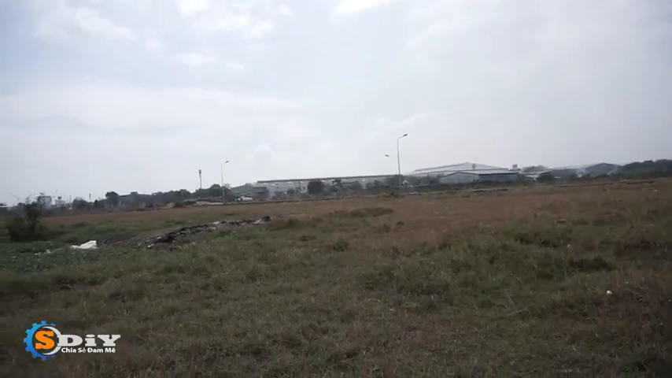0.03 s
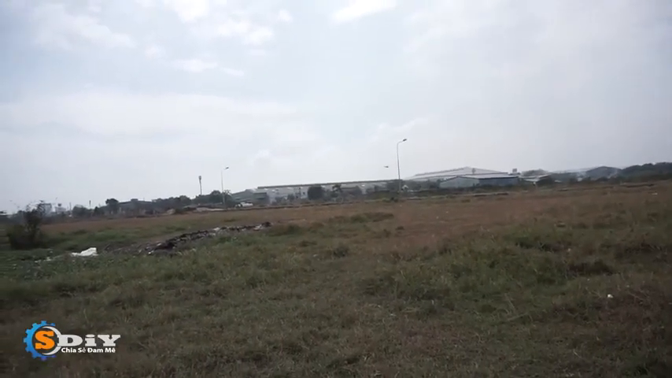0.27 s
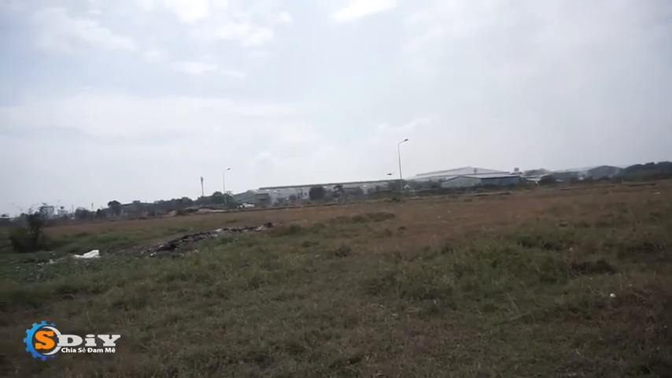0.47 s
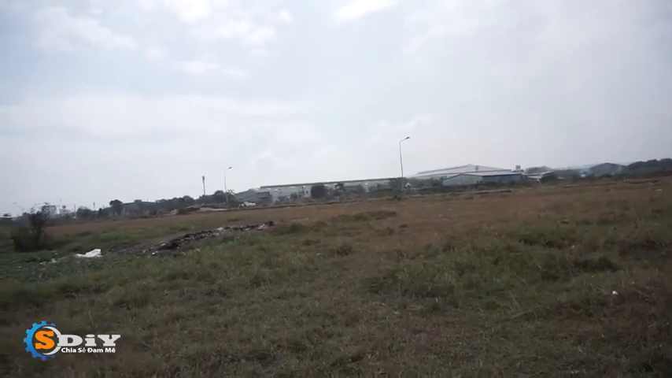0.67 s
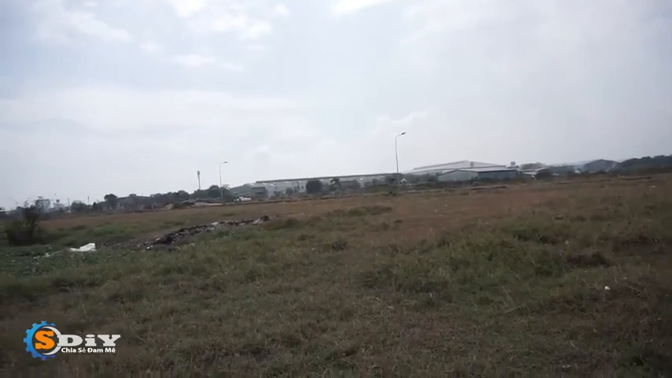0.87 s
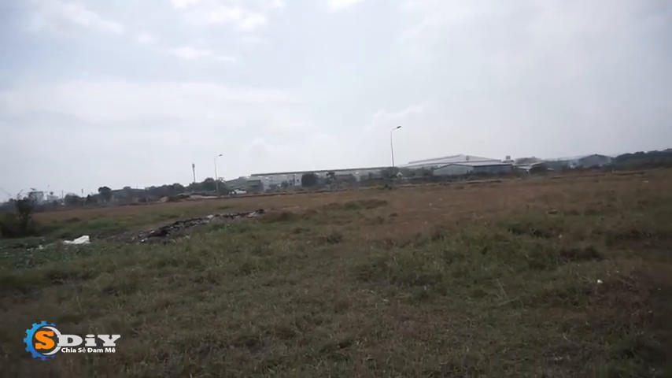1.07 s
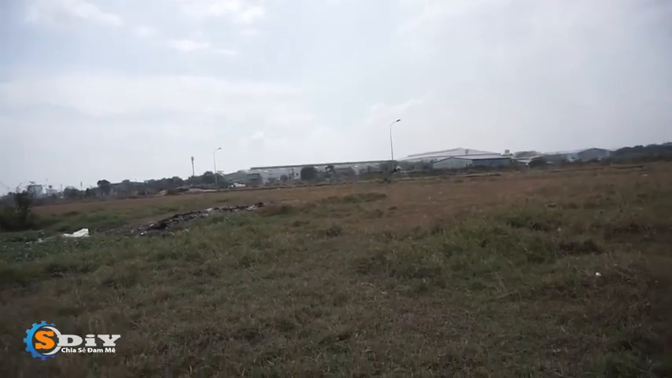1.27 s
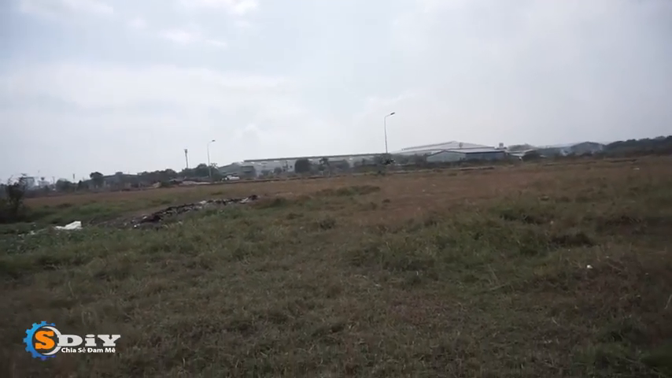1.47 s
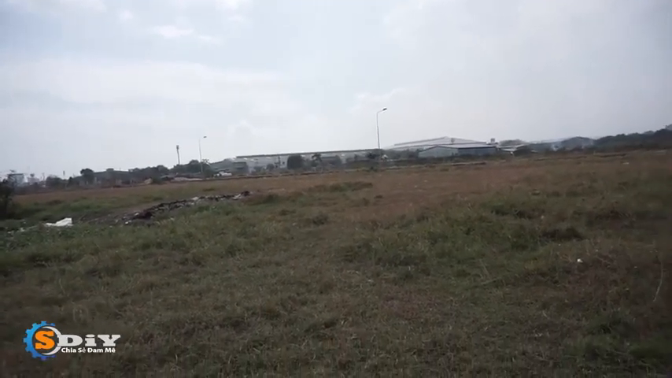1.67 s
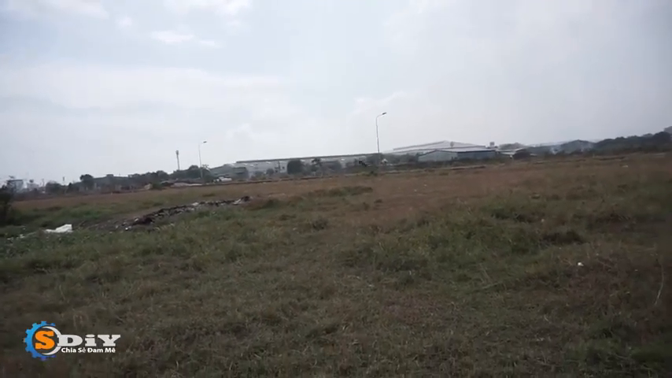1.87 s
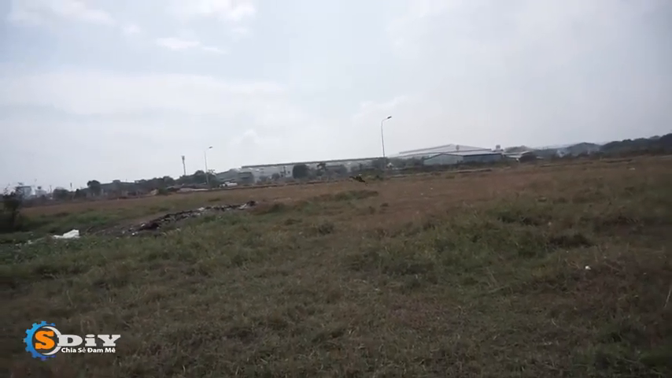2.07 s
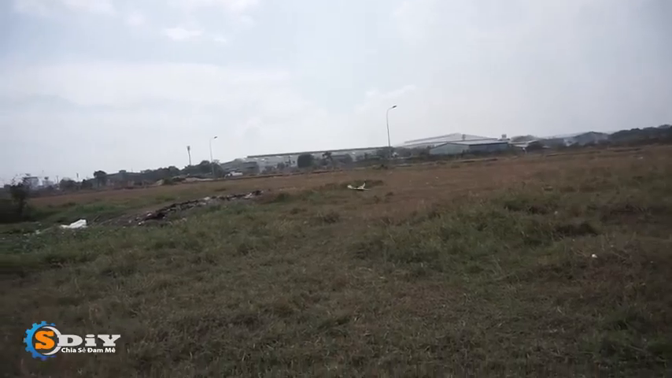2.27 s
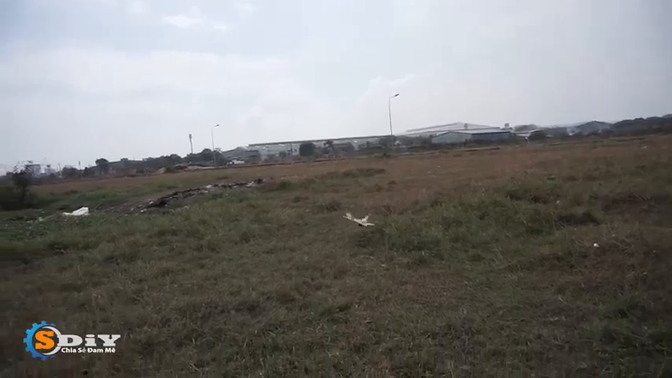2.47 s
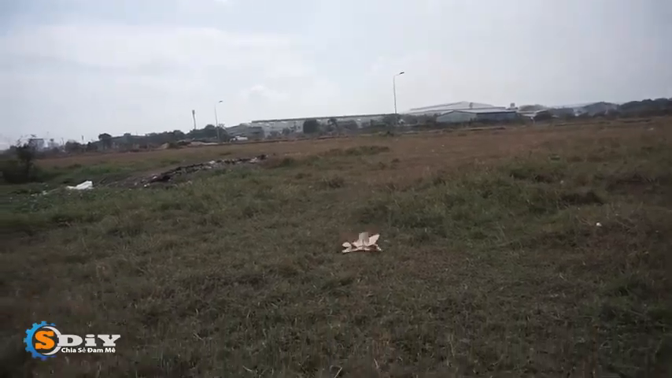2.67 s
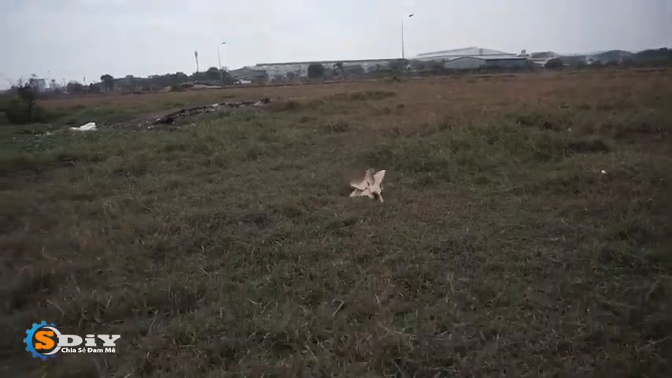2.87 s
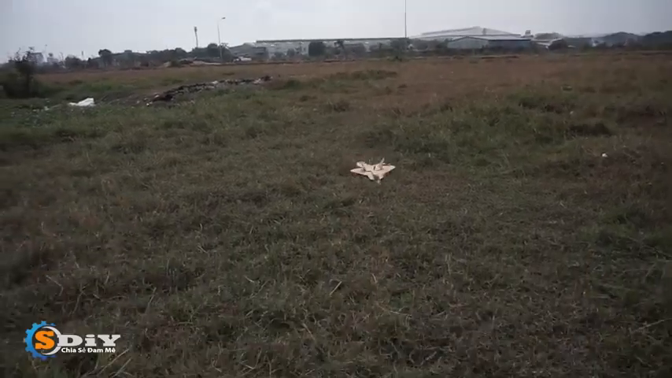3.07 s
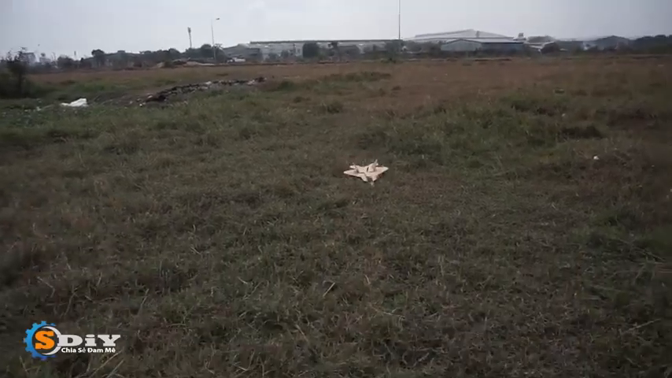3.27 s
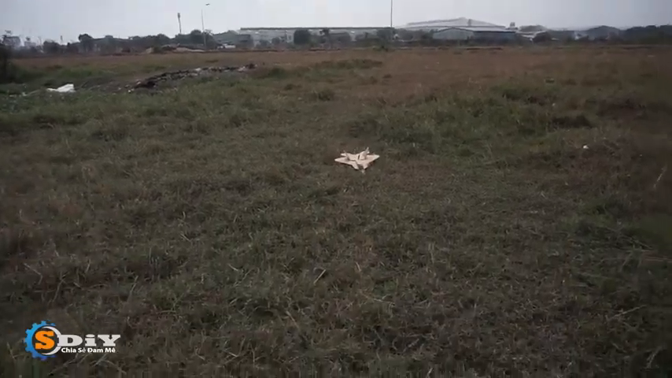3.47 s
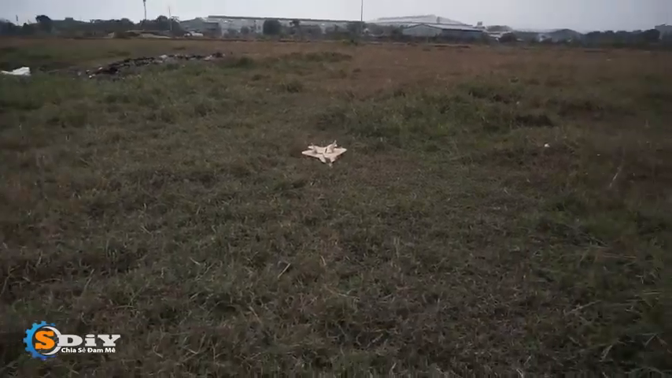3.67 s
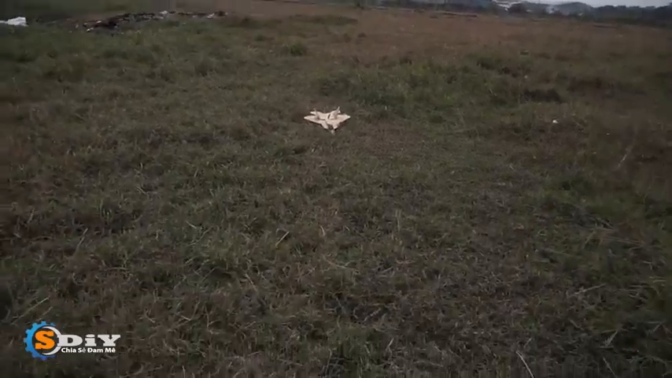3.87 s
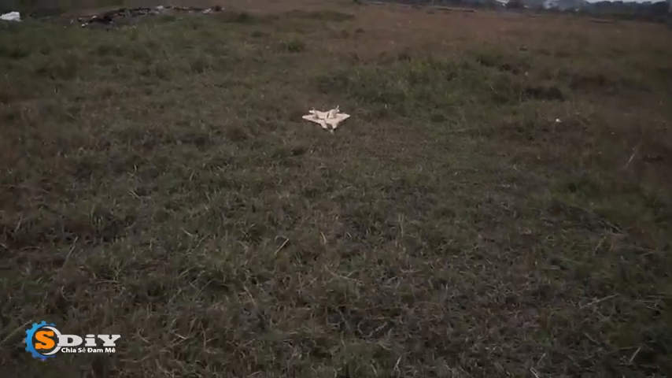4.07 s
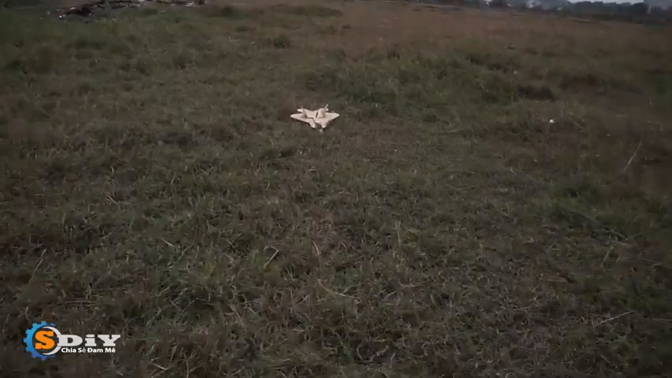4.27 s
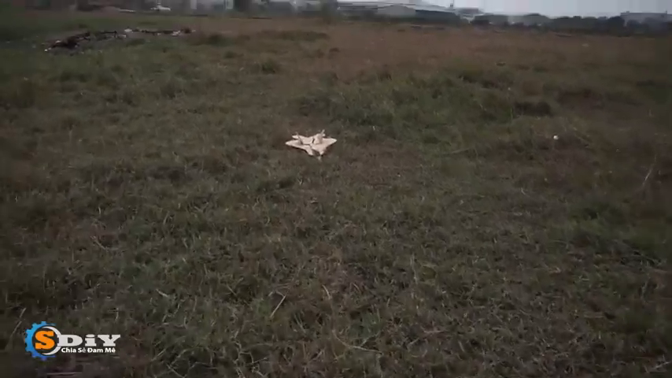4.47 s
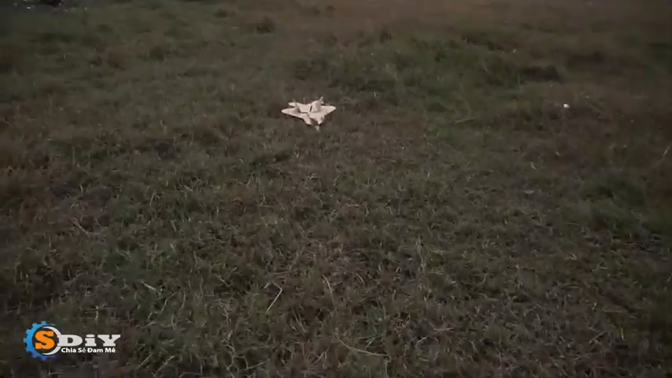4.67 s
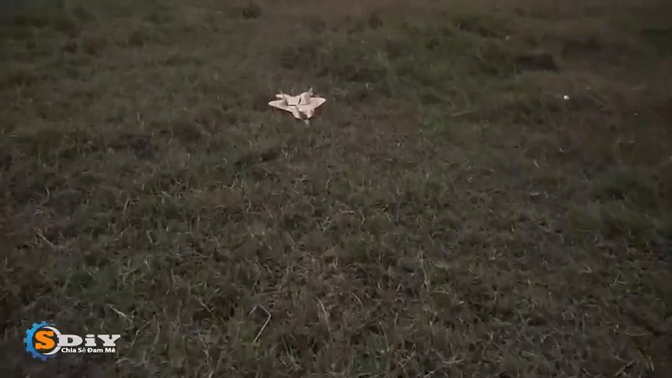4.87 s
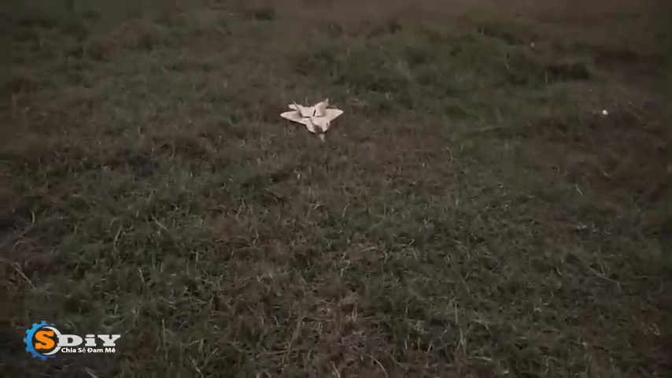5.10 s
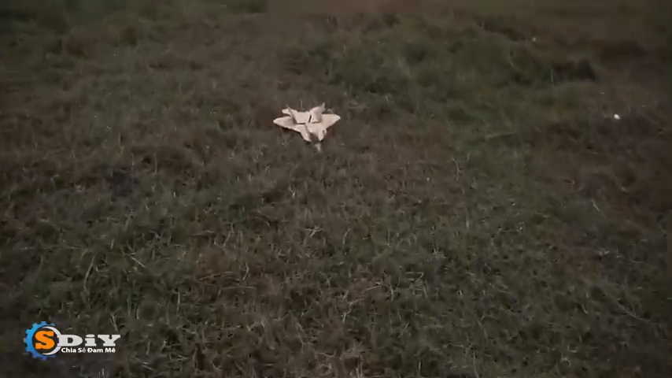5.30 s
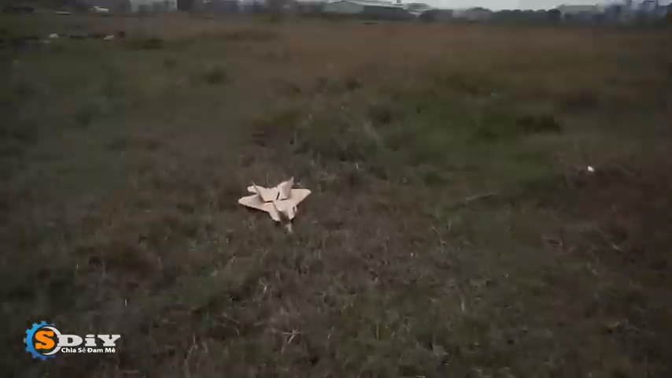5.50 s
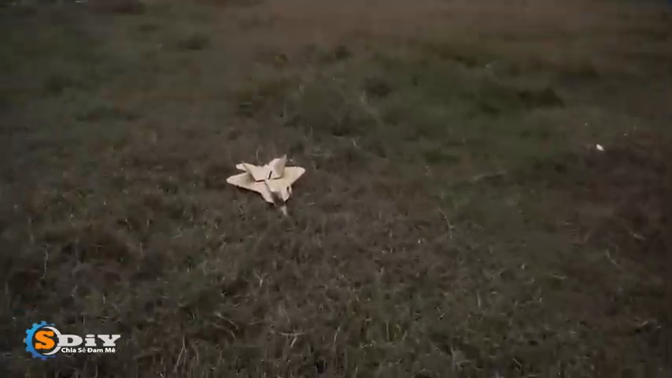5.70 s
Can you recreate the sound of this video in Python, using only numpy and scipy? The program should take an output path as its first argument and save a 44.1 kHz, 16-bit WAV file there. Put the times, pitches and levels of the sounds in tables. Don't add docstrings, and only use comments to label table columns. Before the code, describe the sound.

A small electric model plane buzzes up, winds down and crash-slides into dry grass, while a cricket rasps and footsteps then crackle through stalks.

```python
import sys
import numpy as np
from scipy import signal
from scipy.fft import rfft, irfft, next_fast_len
from scipy.io import wavfile
from scipy.ndimage import uniform_filter1d, map_coordinates

SR = 44100
rng = np.random.default_rng(int(sys.argv[2]) if len(sys.argv) > 2 else 0)


def linear_from_db(decibels):
    return 10 ** (np.asarray(decibels, float) / 20)


def wav_out(sig):
    wavfile.write(sys.argv[1], SR, np.round(np.clip(np.atleast_2d(sig).T, -1, 1) * 32767).astype(np.int16))


N = 253134
T = np.arange(N) / SR

# time in # seconds, level in dB.
BREEZE_LEVEL = [(0, -48.5), (.24, -50), (.28, -53.5), (.5, -51.5), (.8, -49.5), (1.6, -45), (2.2, -48.5),
                (2.6, -48.5), (2.9, -46.5), (3.3, -49.5), (3.65, -49.5), (4.2, -50.5), (4.75, -49),
                (5.0, -50), (5.74, -48.5)]
# frequency in Hz, dB per Hz.
RUMBLE = [(12, -60), (20, -27), (124, -7), (203, -3.5), (231, -4.5), (325, -2.5), (600, -9), (780, -48),
          (1320, -120)]
BREEZE = [(180, -18.5), (300, -12.5), (448, -5), (653, -1.5), (1220, -3), (1420, -5.5), (2230, -5.5),
          (6000, -13.5), (7800, -19), (13200, -120)]
HISS = [(2350, -16), (4000, -3.5), (4310, -6), (4670, -7.5), (9310, -2.5), (10400, -2), (11700, -5),
        (15800, -10.5)]
# frequency in Hz, left-right likeness (-1 to 1).
ALIKE = [(30, 0.5), (70, 0.86), (150, 0.87), (380, 0.018), (950, -0.47), (2380, -0.16), (5980, -0.33),
         (15000, 0.21)]
# frequency in Hz, left-right in dB.
BREEZE_SHADE = [(800, 0), (1600, -3), (3500, -3), (6000, 0)]
RUMBLE_DB, HISS_DB, HISS_GROWS = -62, -54, 1.2
GUST_DB = .8
STIRRED_DB, STIRRED_HISS_DB = -13, -17

# start in seconds, end in seconds, top level in dB, left-right in dB,
# lower wing mode in dB.
CRICKET = [
    (-.2, 0.215, -43.5, 7.5, -9.5),
    (.41, 0.853, -43.5, 7.5, -13),
    (1.1, 1.519, -41.5, 7, -11),
    (1.76, 2.175, -42.5, 8.5, -14),
    (2.41, 2.723, -42.5, 11.5, -15.5),
    (3.07, 3.473, -40, 24, -21),
    (3.71, 4.165, -41.5, 18, -14),
    (4.42, 4.747, -52.5, 10, -4),
]
WARM_UP_DB, WARM_UP_S, STOP_S = 20, 0.076, 0.0096
WING_HZ, WARM_UP_HZ = 11045, 240
FACING, TURNED, TURN_S = 2.8, .9, 2.9

# time in seconds, level in dB, lag of the ground echo in ms.
APPROACH = [(.68, -68, .04), (.74, -60, .02), (.8, -51, 0.027), (.86, -44, 0.055), (.95, -43, 0.034),
            (1.03, -43.5, 0.052), (1.2, -40.5, 0.028), (1.36, -39, 0.047), (1.46, -39, 0.06),
            (1.52, -41.5, 0.052), (1.6, -47, 0.04), (1.69, -47.5, 0.26), (1.83, -49.5, 0.34),
            (1.98, -55.5, 0.35), (2.06, -65, 0.38), (2.4, -69, 0.49), (2.7, -67, 1)]
# time in seconds, rate in Hz.
SPEED = [(0.684, 345), (0.748, 494), (0.786, 543), (0.836, 577), (0.944, 602), (1.002, 570), (1.065, 554),
         (1.2, 560), (1.464, 558.4), (1.516, 519.5), (1.6, 414), (1.684, 343), (1.83, 328), (2.03, 244),
         (2.18, 191), (2.35, 160), (2.55, 135), (2.7, 122.5)]
# order, level in dB.
BLADE = [(1, -11.5), (2, -7), (3, 4), (4, -7), (5, -3), (6, -4.5), (7, -7), (8, -11), (9, -8), (10, -17.5),
         (11, -17), (12, -14.5), (13, -32), (14, -12), (15, -16), (16, -18)]
# order, time in seconds,
# width in seconds, gain in dB.
LOBES = [(4, 0.86, 0.15, 7.5), (4, 1.194, 0.055, -4), (4, 1.414, 0.096, 5.5), (3, 0.87, 0.082, -1),
         (3, 1.546, 0.077, -6), (5, 0.91, 0.052, -2.5), (5, 1.526, 0.039, 3), (6, 0.93, 0.053, 1.5),
         (6, 1.46, 0.09, -10), (7, 1.01, 0.053, -2.5), (7, 1.447, 0.043, 6), (9, 0.89, 0.064, -11),
         (7, 1.4, 0.0355, -0.5), (7, 1.72, 0.05, 5), (10, 1.9, 0.09, -8), (9, 1.72, .06, -1),
         (8, 1.95, .07, 6), (7, 1.95, .06, 4), (10, .97, 0.065, -4), (6, 2.0, .08, 0), (4, 2.25, 0.29, 14),
         (7, 2.07, 0.088, 11), (3, 2.37, 0.13, -20), (5, 0.76, 0.031, 7.5), (11, 1.1, 0.36, -17),
         (9, .78, .04, 7.5), (8, 0.8, 0.044, 3), (7, .72, 0.044, -8), (6, 0.76, 0.034, 0),
         (13, 1.53, .07, 13), (8, 1.76, .05, -12), (6, 1.81, 0.081, -13), (9, 1.84, .04, -18),
         (5, 2.02, 0.11, -11), (11, 2.03, .12, 15), (9, 2.2, 0.05, 13), (10, 2.2, .08, 13),
         (7, 2.35, .1, 14), (14, 1.2, .04, -2), (9, 2.0, .05, 0), (9, 1.52, 0.057, -7),
         (10, 0.81, 0.093, -7), (9, 0.96, 0.033, -5), (11, 1.95, 0.037, 7), (10, 2.1, 0.043, 8),
         (8, 2.13, .1, 4), (3, 0.66, .03, 0), (1, 0.825, 0.045, 3.5), (5, 1.38, 0.066, -1),
         (7, 1.83, .06, -4)]
# frequency in Hz, dB per Hz.
WASH = [(400, -47), (700, -10), (1950, -6), (2800, 0.5), (4100, -6), (6500, -6), (8500, 4.5), (12000, -3),
        (15500, -12)]
# peak in seconds, level in dB,
# rise in seconds, fall in seconds to -20 dB.
SWITCH = [
    (.67, -56, .04, .5),
    (.91, -40, .2, .24),
    (1.34, -39, .16, .12),
    (1.53, -48, .08, .14),
    (1.83, -53, .1, .25),
    (1.95, -55, .15, .025),
]
# peak in seconds, level in dB,
# rise in seconds, fall in seconds to -20 dB.
WHINE = [
    (2.17, -66, .06, .2),
    (2.25, -68, .2, .2),
    (2.31, -61, .08, .12),
    (2.46, -59, .03, .5),
    (2.62, -51.5, .24, 1.5),
    (2.698, -52, .3, .01),
]
GROUND_ECHO = 0.44
AIR_DB, AIR_DB_PER_OCTAVE, FULL_HZ = -39, 14, 586
SWITCH_HZ = 8207
MAGNETS = 27.85
PLANE_LAG_US = 26

# time in seconds, peak in dB, ring in Hz, left-right in dB.
SNAPS = [(2.284, -37, 9500, 2), (2.6868, -27, 10500, 3), (2.7028, -16, 10500, 4), (2.7113, -11, 9900, 5),
         (2.7143, -10.5, 10270, 4), (2.7438, -7, 9770, 3), (2.9442, -19, 9000, .6), (3.032, -24, 10300, 3),
         (3.1258, -25, 10800, 3), (3.127, -25, 8500, 2), (3.1744, -29, 11000, 1.5),
         (4.2772, -27, 12900, 8.5), (4.3, -26, 12800, 9), (4.373, -26, 12500, 9), (4.4324, -23, 12300, 9),
         (4.4707, -24, 12000, 9), (4.4764, -19, 9500, 6), (4.4842, -19, 12500, 12),
         (4.4881, -23, 12500, 10), (4.4912, -22, 12500, 10), (4.4963, -26, 12000, 9),
         (4.5006, -18, 10000, 7), (4.944, -26, 12400, 10), (4.975, -23, 12800, 10),
         (4.9915, -22, 12100, 10), (4.9988, -20, 13000, 10), (5.0562, -20, 12800, 8),
         (5.2094, -34, 11500, 8), (5.568, -25, 12500, 10), (5.575, -22, 12800, 10),
         (5.5844, -24, 12100, 10), (5.6155, -22, 12100, 8.5), (5.631, -19, 12800, 7),
         (5.647, -25, 11500, 7)]
SNAP_T60_S = .003
# time in seconds, peak in dB, ring in Hz,
# t60 in seconds, left-right in dB.
STALK = [
    (5.7027, -21, 9500, .003, 6),
    (5.705, -6, 9600, .0024, 10),
    (5.705, -10, 13000, .0024, 8),
]
# time in seconds, peak in dB, ring in Hz, t60 in seconds,
# left-right in dB.
THUDS = [(2.5, -45.5, 660, 0.05, -2.0), (3.7, -41, 600, .02, 0), (3.14, -48, 780, .05, 0),
         (3.19, -46, 780, .04, 0), (4.658, -45.5, 400, 0.046, 0.5), (4.652, -46, 940, 0.045, 0),
         (5, -45, 1800, 0.033, 2), (4.695, -43, 540, 0.051, 0), (5.4, -45, 520, 0.059, 0),
         (4.72, -45, 550, 0.08, 0.0), (5.4, -43, 610, 0.048, 0), (4.905, -47.5, 790, .02, -1),
         (6.2, -33, 600, 0.013, 4)]
# time in seconds, peak in dB, ring in Hz,
# t60 in seconds, left-right in dB.
TUFTS = [(2.7, -33, 2730, .02, -11), (2.7143, -27, 2300, 0.015, -9), (2.723, -26, 3970, .008, 1),
         (2.736, -23.5, 1050, 0.013, 0), (2.749, -17.5, 2510, 0.014, -6), (2.751, -29, 1180, 0.011, 0),
         (2.764, -22, 1270, 0.011, 2), (2.77, -30, 810, 0.022, 0), (2.802, -37, 890, .02, 0),
         (2.775, -38, 3320, 0.0089, 0), (2.794, -29, 4300, .016, 9)]
# time in seconds, peak in dB, ring in Hz,
# t60 in seconds, left-right in dB.
KNOCKS = [(2.8954, -55, 2680, 0.011, -9), (2.945, -34, 2660, 0.0065, -17), (3.0964, -46, 2750, 0.0089, -32),
          (3.1097, -35, 2900, 0.02, 5), (3.1147, -36.5, 2730, 0.057, -9), (3.1266, -42, 2370, 0.014, -1.0),
          (3.1462, -43, 2500, .025, -2), (3.1666, -41, 1750, 0.017, -5), (3.1666, -41, 2450, .03, -4),
          (3.1755, -36, 1800, 0.012, -6), (3.243, -44, 2700, .03, -3), (3.263, -42, 2300, 0.022, -3),
          (3.3762, -43, 2620, .02, -2), (3.687, -39, 2250, 0.017, -10), (3.957, -46, 2500, 0.034, -12),
          (3.958, -49, 3140, .025, -5), (3.994, -57, 1900, .015, 0), (4.4764, -39, 3000, 0.017, 7),
          (4.5002, -36, 1830, 0.0092, 1.5), (4.929, -41, 2130, .015, 1), (5.446, -42, 2200, 0.013, .5),
          (5.6466, -35, 2290, 0.014, 5), (5.7047, -35, 3400, .005, 0)]
# time in seconds,
# peak in dB, ring in Hz, t60 in seconds, left-right in dB.
HOLLOW = [(3.0306, -26, 870, 0.013, -2), (3.031, -34, 1400, 0.0052, 2), (3.0315, -30, 4100, .007, 0),
          (3.043, -41, 846, 0.018, 0), (3.031, -25.5, 1930, 0.026, -10), (3.031, -30, 2350, 0.017, -10),
          (3.031, -28, 3320, .014, 8), (3.0322, -25, 5200, .006, -4), (3.031, -26.5, 417, 0.024, 6),
          (3.0352, -31, 800, 0.025, 11), (3.0352, -32.5, 680, 0.029, 12), (3.686, -38, 2600, 0.01, 0),
          (3.6865, -43, 850, 0.011, 0), (3.686, -42, 560, .014, -3), (3.686, -39, 1950, .012, -3),
          (3.6865, -37, 2250, 0.014, -3), (4.4765, -31, 646, 0.014, 2), (4.4762, -34, 1500, 0.0067, 2),
          (5.646, -37, 700, .012, -2), (5.585, -41, 1200, .012, 0), (5.6918, -37, 2430, 0.015, -23),
          (5.6937, -21.5, 2450, 0.0082, -9), (5.6937, -40, 3200, 0.005, -10), (5.698, -40, 2280, .02, -8)]

# peak in seconds, rise in seconds, fall in seconds,
# hiss in dB, body in dB.
SLIDE = [
    (2.688, 0.0015, 0.1, -35.5, -48),
    (2.704, .02, .05, -30, -40),
    (2.714, 0.017, 0.11, -23, -31),
    (2.747, 0.034, 0.098, -24, -26),
    (2.8, 0.041, 0.11, -32.5, -47),
    (2.902, 0.057, 0.24, -40.5, -45.5),
    (3.035, 0.027, 0.027, -39.5, -36),
    (3.115, 0.31, .08, -40, -45.5),
    (3.179, 0.12, 0.025, -37.5, -44),
    (3.22, 0.38, 0.27, -43.5, -50),
]
# frequency in Hz, dB per Hz.
SLIDE_HISS = [(2650, -37), (4500, -16), (7690, -10), (8630, -5.5), (10100, -1), (11100, -0.5),
              (12300, -11.5), (15800, -10)]
SLIDE_BODY = [(280, -57), (480, -18), (764, -6), (1940, -5.5), (2130, -4.5), (2420, -0.5), (2960, -2),
              (6000, -8.5), (7800, -34), (13200, -120)]
# frequency in Hz, left-right in dB.
SLIDE_SHADE = [(6000, -1), (8000, 0), (10000, 3), (11000, 3), (12300, -1), (14000, -4.5)]

# peak in seconds, rise in seconds, fall in seconds, hiss in dB, scuff in dB.
FEET = [(3.94, 0.59, 0.5, -56, -58.5), (4.295, 0.069, 0.93, -42.5, -55), (4.466, 0.3, 0.23, -38, -48),
        (4.477, 0.016, 0.037, -38, -45), (4.65, 0.66, 0.15, -67, -50), (4.936, 0.029, 0.62, -43.5, -49),
        (4.995, 0.12, 0.22, -40.5, -55), (5.052, 0.11, 0.1, -42.5, -46.5), (5.22, 0.31, .07, -43.5, -52.5),
        (5.33, 0.35, 0.36, -52, -59.5), (5.47, 0.031, 1, -42, -60), (5.58, 0.17, 0.53, -42.5, -46.5),
        (5.706, 0.017, 0.072, -64, -63)]
# frequency in Hz, dB per Hz.
BLADES_HISS = [(3530, -61), (6000, -41), (7080, -17), (7800, -14.5), (9030, -9), (12500, -1.5), (14700, -4),
               (15800, -9)]
SCUFF = [(250, -26), (500, -1.5), (1000, -6), (2200, -3.5), (3500, -7), (6000, -17), (7000, -55)]
# frequency in Hz, left-right in dB.
FEET_SHADE = [(8000, -3.5), (10000, -3), (11200, -1), (12300, 1), (14000, -5.5)]
STEP_PAN_DB, PAN_PER_DB = 12, 4.5


def unit(x):
    return x / np.sqrt(np.mean(x ** 2) + 1e-20)


def along(points, hz):
    f, v = np.transpose(points)
    return np.interp(np.log(hz + 1), np.log(f + 1), v)


def curves(rows):
    s, *cols = np.transpose(rows)
    gate = np.clip(np.minimum(T - s[0] + .01, s[-1] + .01 - T) / .01, 0, 1)
    return [gate] + [np.interp(T, s, c) for c in cols]


def wobble(rate):
    knots = rng.standard_normal(int(N * rate / SR) + 4)
    return map_coordinates(knots, [T * rate])


def swells(peaks, rises, falls, tops):
    lag = T - np.array(peaks)[:, None]
    rising = -lag / np.abs(rises)[:, None]
    falling = lag / np.abs(falls)[:, None]
    slope = np.where(lag < 0, rising, falling)
    power = np.sum(linear_from_db(2 * np.array(tops)[:, None] - 40 * slope), 0)
    return 10 * np.log10(power + 1e-14)


def panned(x, pan_db):
    return x * np.array([linear_from_db(pan_db / 2 + 0 * T), linear_from_db(-pan_db / 2 + 0 * T)])


def rush(spectrum, alike, crackle=0, lag_us=0, shade=((1000, 0),)):
    m = next_fast_len(N + 8192)
    hz = np.fft.rfftfreq(m, 1 / SR)
    grain_db = crackle * np.minimum(rng.exponential(size=N // 16 + 1), 5)
    grains = linear_from_db(grain_db).repeat(16)[:N]
    noise = rfft(rng.standard_normal((2, N)) * grains, m) * linear_from_db(along(spectrum, hz))
    turn = np.arccos(np.clip(along(alike, hz), -1, 1)) / 2
    mid, side = noise * [np.cos(turn), np.sin(turn)]
    late = np.exp(-2j * np.pi * hz * lag_us / 1e6)
    half = linear_from_db(along(shade, hz) / 2)
    return unit(irfft([(mid + side) * late * half, (mid - side) / half], m)[:, :N])


def wake_db():
    octaves = np.log2(curves(SPEED)[1] / FULL_HZ)
    return AIR_DB + AIR_DB_PER_OCTAVE * octaves - 150 * np.clip(.68 - T, 0, 1)


def field():
    _, breeze_db = curves(BREEZE_LEVEL)
    wake = linear_from_db(wake_db()) * (T < APPROACH[-1][0])
    rumble = linear_from_db(RUMBLE_DB + 0.27 * wobble(21)) * rush(RUMBLE, ALIKE)
    breeze_gain = np.hypot(linear_from_db(breeze_db), linear_from_db(STIRRED_DB) * wake) * linear_from_db(GUST_DB * wobble(9.8))
    breeze = breeze_gain * rush(BREEZE, ALIKE, crackle=0.5, shade=BREEZE_SHADE)
    hiss_db = HISS_DB + HISS_GROWS * (breeze_db - breeze_db.mean())
    hiss_gain = np.hypot(linear_from_db(hiss_db), linear_from_db(STIRRED_HISS_DB) * wake)
    hiss = hiss_gain * linear_from_db(0.2 * wobble(7.9)) * rush(HISS, ALIKE)
    return rumble + breeze + hiss


def cricket():
    out = np.zeros((2, N))
    for start, end, top_db, pan_db, lower_db in CRICKET:
        cold = np.exp(-np.clip(T - start, 0, None) / WARM_UP_S)
        gate = (T > start) * np.clip(1 + (end - T) / STOP_S, 0, 1)
        db = top_db - WARM_UP_DB * cold
        wing_hz = WING_HZ - WARM_UP_HZ * cold ** 0.65
        turns = np.cumsum(140 * (1 + 0.0053 * wobble(60))) / SR
        u = np.clip(turns % 1 / .66, 0, 1)
        stroke_db = 0.36 * rng.standard_normal(N // 100)[turns.astype(int)]
        size = linear_from_db(stroke_db + 1.56 * wobble(900))
        ring_hz = wing_hz + 400 * (.5 - u) + 30 * wobble(400)
        phase = 2 * np.pi * np.cumsum(ring_hz) / SR
        shape = np.sin(np.pi * u) ** 1.1 * size
        late = np.sin(np.pi * np.clip((turns % 1 - .55) / .45, 0, 1)) * size
        lower = linear_from_db(lower_db + 1.0) * late * np.sin(0.967 * phase)
        apart = FACING if start < TURN_S else TURNED
        ports = np.array([shape * np.sin(phase) + lower, shape * np.sin(phase + apart)])
        out += panned(gate * linear_from_db(db + 9.5) * ports, pan_db) * linear_from_db(-pan_db / 2 + 3.5)
    return out + chorus()


def chorus():
    spectrum = [(9800, -57), (10600, -4), (11300, 13), (11800, -25), (12500, -65)]
    level_db = -60.5 + 2.5 * wobble(18) - 5 * np.clip(3 - T, 0, 1)
    return linear_from_db(level_db) * rush(spectrum, [(11000, -0.055)])


def blade_orders(hz, phase, level_db, lag_ms):
    late = 2 * np.pi * hz * [[PLANE_LAG_US / 1e6], [0]]
    tone = np.zeros((2, N))
    for k, db in BLADE:
        level = db + level_db + (0.4 + 0.08 * k) * wobble(22) + (.3 + .15 * k) * wobble(90)
        level -= 10 * np.log10(1 + (500 / (k * hz)) ** 16)
        for order, s, width, gain_db in LOBES:
            if round(order) == k:
                level += gain_db * np.exp(-((T - s) / width) ** 2)
        level -= 14 * max(k - 9, 0) * np.clip(1 - hz / 556, 0, .3)
        comb = np.abs(1 + GROUND_ECHO * np.exp(-2j * np.pi * k * hz * lag_ms / 1e3))
        jitter = (.15 + 0.024 * k) * wobble(70)
        wave = np.sin(k * (phase - late) + 0.38 * k + jitter)
        tone += panned(comb * linear_from_db(level) * wave, -3.5 + 0.5 * wobble(1.7))
    return tone


def turbulence(phase):
    alike = [(500, 0.47), (3000, 1.0), (8000, .8), (11000, 0.34)]
    air = linear_from_db(wake_db()) * (1 + 0.11 * np.sin(phase)) * rush(WASH, alike, lag_us=24.4)
    return air * (T < APPROACH[-1][0])


def controller_tone(phase):
    s, db, rise, fall = np.transpose(SWITCH)
    tone = np.sin(2 * np.pi * SWITCH_HZ * T + .3 * wobble(26.9))
    return linear_from_db(swells(s, rise, fall, db)) * (1 + 0.16 * np.sin(phase)) * tone


def magnet_whine(hz):
    s, db, rise, fall = np.transpose(WHINE)
    level_db = swells(s, rise, fall, db) + 1.5 * wobble(39.65)
    return linear_from_db(level_db) * np.sin(2 * np.pi * MAGNETS * np.cumsum(hz) / SR)


def propeller():
    gate, level_db, lag_ms = curves(APPROACH)
    hz = uniform_filter1d(curves(SPEED)[1], size=1500)
    phase = 2 * np.pi * np.cumsum(hz * (1 + 0.001 * wobble(40))) / SR
    blades = gate * blade_orders(hz, phase, level_db, lag_ms)
    motor = panned(controller_tone(phase) + gate * magnet_whine(hz), -5.5)
    return np.sqrt(2) * (blades + motor) + panned(turbulence(phase), -0.82)


def clicks(events, noisy, lag=0, lowest_hz=300):
    out = np.zeros((2, N + SR))
    t = np.arange(SR // 20) / SR
    for s, db, hz, t60, pan_db in events:
        one_cycle = np.sin(2 * np.pi * hz * t[:max(4, int(SR / hz))])
        crack = np.convolve(rng.standard_normal(len(t)), one_cycle, "same")
        ring = np.sin(2 * np.pi * hz * t) + noisy * unit(crack)
        blow = linear_from_db(db - 60 * t / max(t60, 1e-3)) * (1 - np.exp(-1.5 * hz * t)) * ring
        start = round((s + .0005) * SR)
        out[0, start:][:len(t)] += blow * linear_from_db(pan_db / 2)
        out[1, start + lag:][:len(t)] += blow * linear_from_db(-pan_db / 2)
    high_pass = signal.butter(4, lowest_hz, "high", fs=SR, output="sos")
    return signal.sosfilt(high_pass, out[:, :N])


def snaps():
    stalks = [(s, db, hz, SNAP_T60_S, pan_db) for s, db, hz, pan_db in SNAPS]
    near_port = clicks(STALK, noisy=.2, lag=2, lowest_hz=7000)
    return clicks(stalks, noisy=.45, lag=1, lowest_hz=7000) + near_port


def blows():
    thuds = clicks(THUDS, noisy=0.85)
    hollow = clicks(HOLLOW, noisy=0.23)
    return thuds + hollow + clicks(KNOCKS + TUFTS, noisy=0.41)


def slide():
    *shape, hiss_tops, body_tops = np.transpose(SLIDE)
    hiss_alike = [(5000, .8), (11000, .8), (14000, .4)]
    scrape = rush(SLIDE_HISS, hiss_alike, crackle=.9, lag_us=19, shade=SLIDE_SHADE)
    hiss = linear_from_db(swells(*shape, hiss_tops) + 4) * scrape
    body = linear_from_db(swells(*shape, body_tops) - 0.9) * rush(SLIDE_BODY, [(1000, 0.87)], crackle=.8)
    return panned(hiss, 0.69) + panned(body, -1.2)


def feet():
    *shape, hiss_tops, scuff_tops = np.transpose(FEET)
    hiss_db = swells(*shape, hiss_tops)
    pan_db = np.clip(STEP_PAN_DB + PAN_PER_DB * (hiss_db + 43.0), 3, 15)
    brush = rush(BLADES_HISS, [(8000, 0.37)], crackle=1.2, lag_us=-30, shade=FEET_SHADE)
    hiss = linear_from_db(hiss_db + 2.5) * brush
    scuff = linear_from_db(swells(*shape, scuff_tops) - 1.0) * rush(SCUFF, [(1000, 0.47)], crackle=1.4)
    return panned(hiss, pan_db) + panned(scuff, 0.12 * pan_db)


def scene():
    return field() + cricket() + propeller() + snaps() + blows() + slide() + feet()


def top_cut(x):
    return signal.sosfilt(signal.butter(12, 16840, fs=SR, output="sos"), x)


def record(dry):
    hz = np.fft.rfftfreq(N, 1 / SR)
    band = (hz < 15880) / np.sqrt(1 + (55 / (hz + 1)) ** 4)
    mix = irfft(rfft(dry) * band, N)
    return top_cut(mix)


dry = scene()
out = record(dry)
wav_out(out)
```